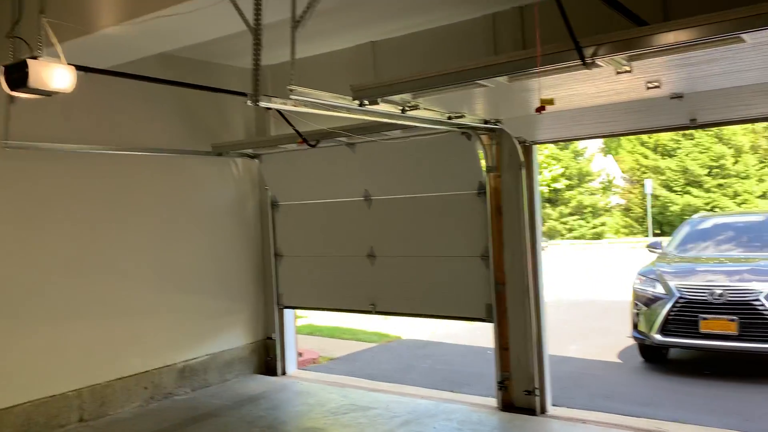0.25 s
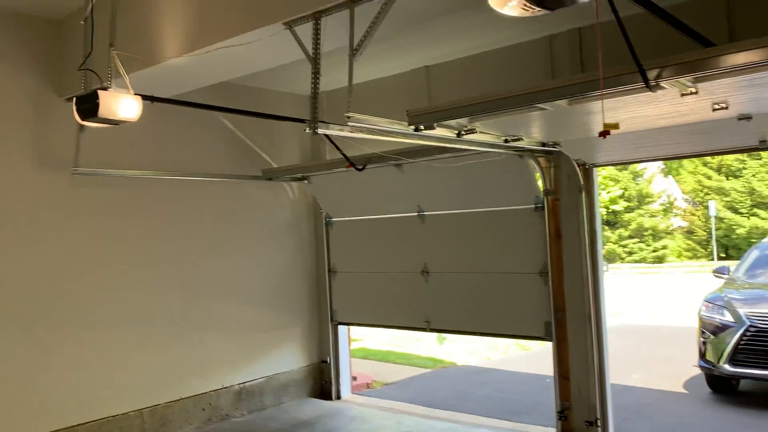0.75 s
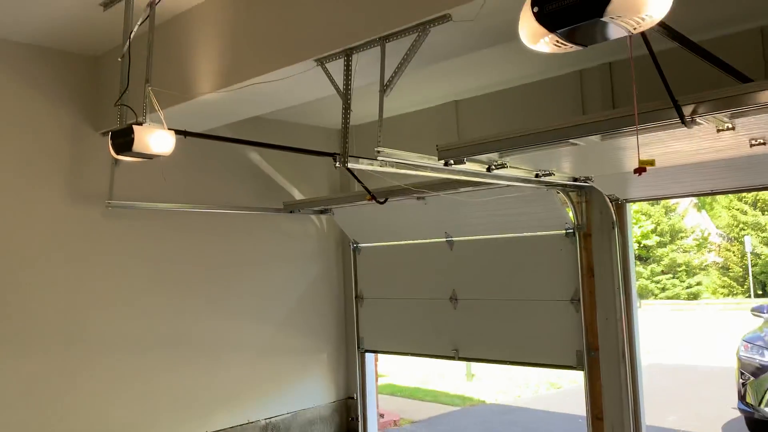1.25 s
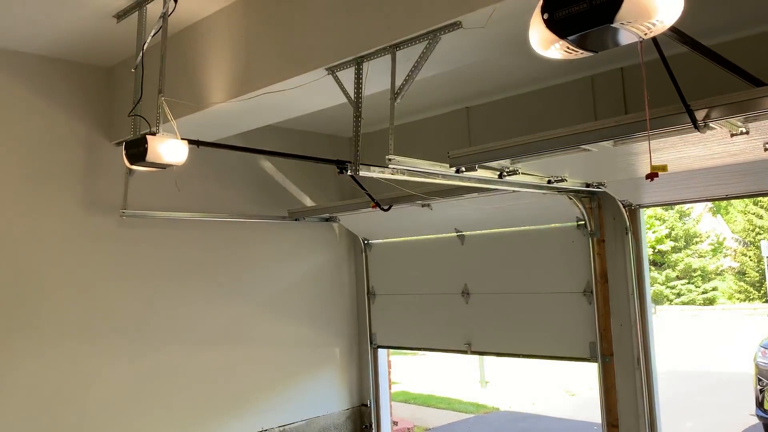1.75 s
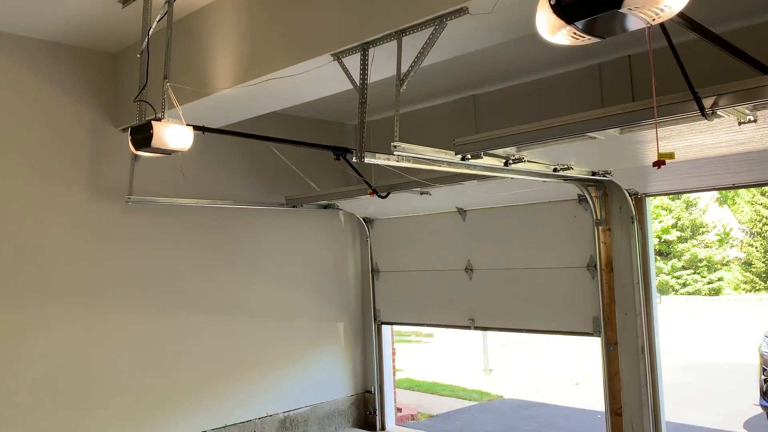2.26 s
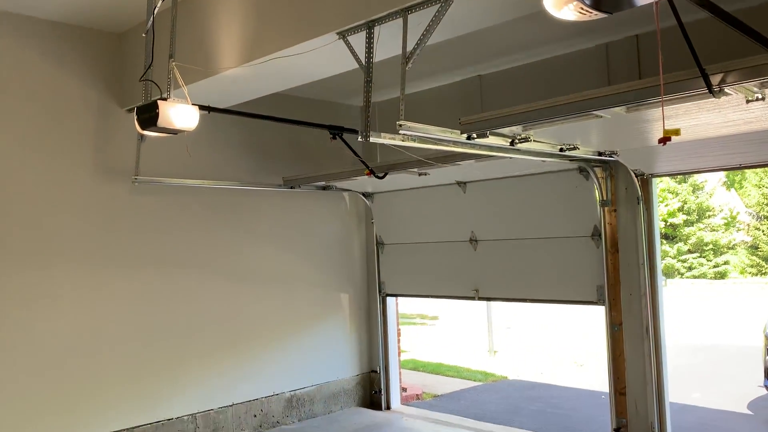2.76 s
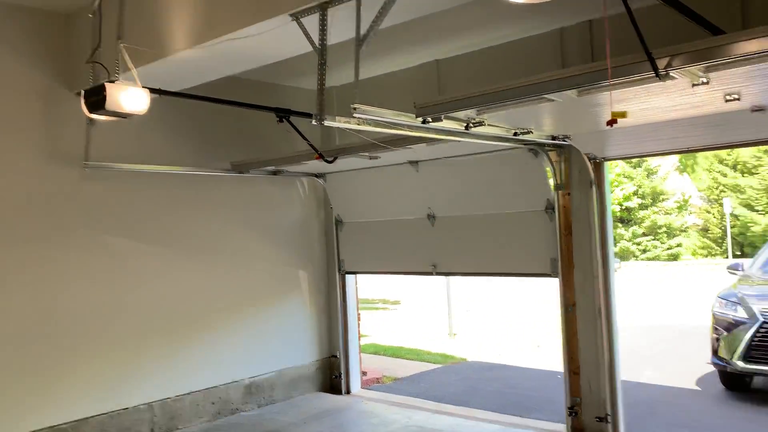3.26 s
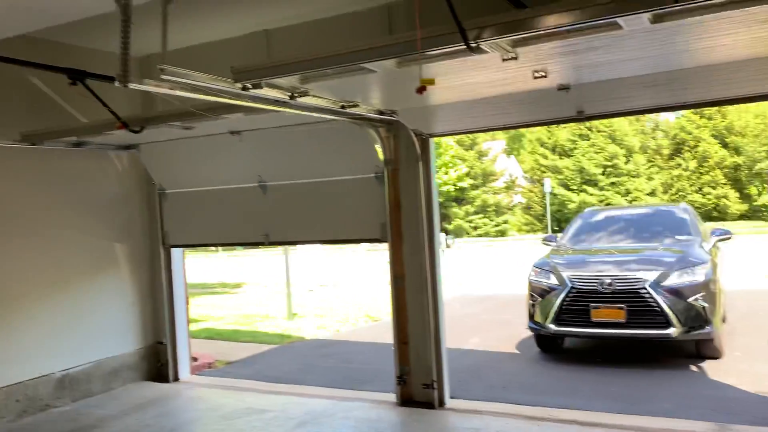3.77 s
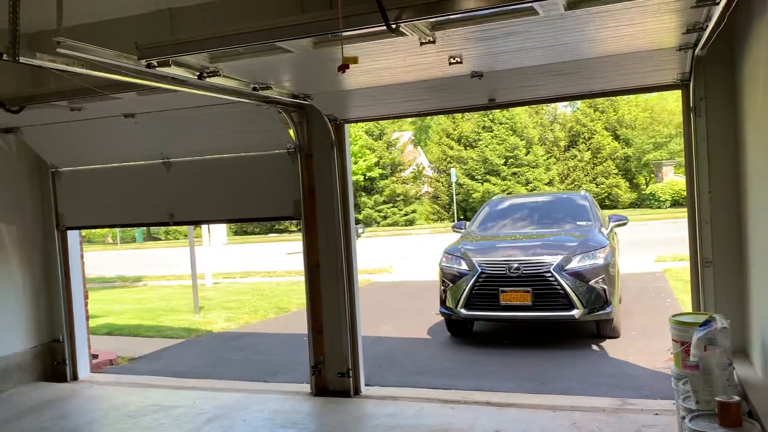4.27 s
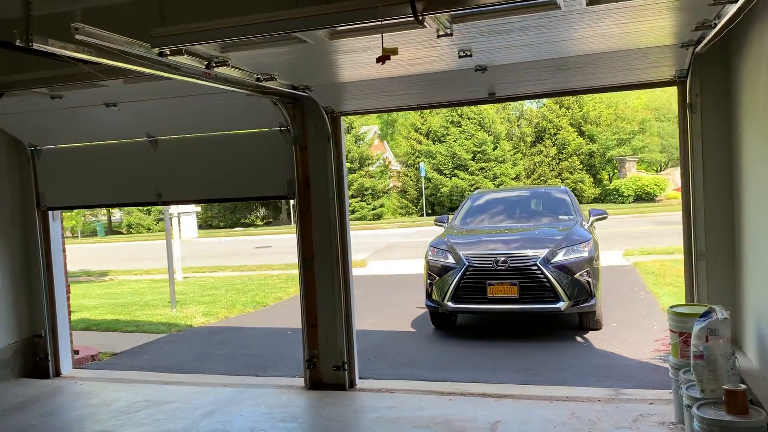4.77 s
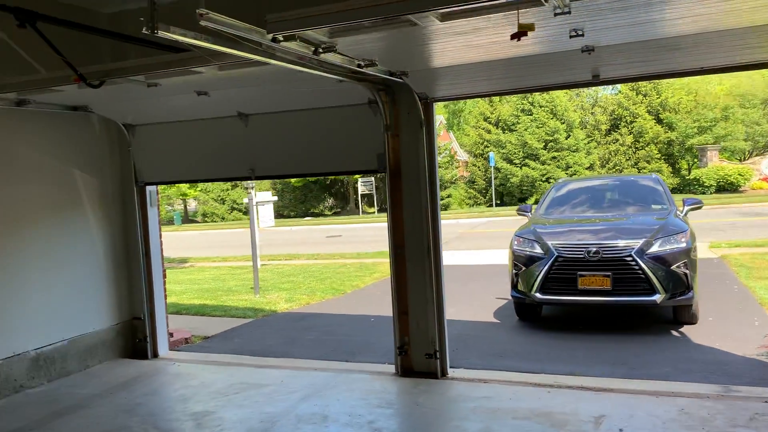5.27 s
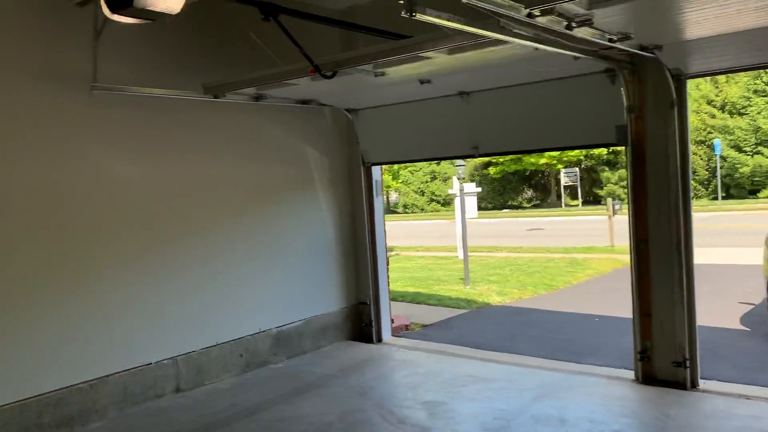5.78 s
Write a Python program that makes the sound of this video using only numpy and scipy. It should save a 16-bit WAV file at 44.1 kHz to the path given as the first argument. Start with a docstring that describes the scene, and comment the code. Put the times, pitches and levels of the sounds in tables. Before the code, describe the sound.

A garage door opener hums loudly overhead while a steel door rattles along its track, with clanks, thuds, and a short rising hinge squeal.

```python
"""An induction-motor opener under a garage ceiling hauls a sectional steel door along its tracks.
The motor's hum is a sum of sines at multiples of twice the mains frequency; joists, rollers, gears,
brackets and chain are coloured, flickering noise. Gliding sines squeal at a hinge and groan at a joint,
noise bursts ring the steel track, low sines thud in the panels; bare walls smear squeals and clanks.
Stereo comes from the two ports of a hand-held phone, turning about in the hum's standing waves."""
import sys
import numpy as np
from scipy import signal
from scipy.fft import rfft, irfft
from scipy.io import wavfile
from scipy.ndimage import uniform_filter1d

SR = 44100
rng = np.random.default_rng(int(sys.argv[2]) if len(sys.argv) > 2 else 0)


def transcribe(signal):
    """Save signal, clipped to [-1, 1], as a 16-bit WAV file at the path in sys.argv[1]."""
    frames = np.atleast_2d(signal).T
    limited = np.clip(frames, -1, 1)
    pcm = np.round(limited * 32767).astype(np.int16)
    wavfile.write(sys.argv[1], SR, pcm)


N = 266364
T = np.arange(N) / SR  # s
F = np.maximum(np.arange(N // 2 + 1) * SR / N, 1.)  # Hz
HUM_HZ = 119.9
SHAFT_HZ = 28.77  # mean rotor speed; the chain beats at half of it


def hum():
    """Magnetic pull on the stator at twice the mains frequency and its multiples."""
    # first order in the standing waves: start_s, level_db, left_minus_right_db
    first = [(0.0, -24, 0), (0.1, -21.5, -3.5), (0.3, -23, -2.5), (0.5, -29, -9), (0.68, -28.5, 5),
             (1.1, -24.5, 4.5), (1.5, -24.5, 5), (2.15, -22.5, 4), (2.64, -21, 3.5), (3.1, -22.5, 4.5),
             (3.6, -21, 4.5), (4.0, -22.5, 4.5), (4.4, -20.5, 3.5), (4.81, -15.5, 1.5), (5.5, -14, 1),
             (6.1, -13, 0.5)]
    # start_s, second_order_db, second_left_minus_right_db, third_order_db
    second_third = [(0.0, -41.5, 5, -46), (0.7, -47, 20, -57), (1.28, -37.5, 10, -63),
                    (1.72, -31.5, 2, -44), (2.3, -28, 2, -41.5), (2.79, -33, 7, -45), (3.2, -32, 2, -37),
                    (3.63, -36, 1, -38), (3.97, -33, 2, -37), (4.3, -41, 8, -41), (4.74, -41.5, 13, -55),
                    (5.0, -33, 6.5, -38), (5.26, -30, 3, -53.5), (5.58, -29.5, -1, -40.5),
                    (5.89, -39.5, 1, -47), (6.1, -34, 6, -33)]
    # start_s, fifth_order_db
    fifth = [(0, -58), (3.7, -61), (4.1, -49), (5.2, -45), (5.6, -60), (6.04, -56)]
    # steady upper orders: order, level_db
    upper = [(4, -55.5), (6, -49.5)]
    # start_s, right_port_lead_rad at first order, half_right_port_lead_rad at second order
    port_lead = [(0, .6, -1), (.75, .7, -.7), (1.4, .35, -.4), (3, .27, -.3), (4.2, .27, -.6),
                 (4.8, .27, .3), (5.3, .2, .25), (6.04, .1, 0)]
    # brief dips of the first order: centre_s, left_depth_db, right_depth_db
    dips = [(3.165, 4, 9), (3.45, 5, 11)]
    dip_half_s = 0.043
    waver_db, waver_per_s, throb_db = 1.6, 12, .6

    side = np.array([[.5], [-.5]])  # left, right
    level1_db, pan1_db = columns(first)
    level2_db, pan2_db, level3_db = columns(second_third)
    level5_db, = columns(fifth)
    lead_rad, half_lead2_rad = columns(port_lead)
    dip_db = bumps([(s, dip_half_s, *db) for s, *db in dips])
    orders = [(1, level1_db + side * pan1_db - dip_db), (2, level2_db + side * pan2_db),
              (3, level3_db), (5, level5_db)] + upper
    out = 0
    for k, db in orders:
        # higher orders break into more room modes: each port wavers alone
        waver = undb(waver_db * (k > 2) * np.array([walk(waver_per_s), walk(waver_per_s)]))
        throb = undb(throb_db * (k > 1) * np.sin(np.pi * SHAFT_HZ * T))  # with the chain
        lead = half_lead2_rad if k == 2 else lead_rad
        phase = k * (2 * np.pi * HUM_HZ * T - side * lead) + 2 * np.pi * rng.random()
        out = out + waver * throb * undb(db) * np.sin(phase)
    return np.sqrt(2) * out


def drive_train():
    """Joists shake, rollers rumble in panels, gears whirr, brackets rattle; chain hisses and sizzles."""
    # noise colours, one table a layer: freq_hz, density_db_per_hz
    shake_colour = [(18, -10), (25, -11), (35, -4), (55, 5), (70, 5), (90, -19)]
    rumble_colour = [(60, -10.5), (80, -8.5), (100, 2), (140, 3.5), (175, -8.5), (230, 1.5), (300, -6),
                     (370, 1), (440, -14), (540, -18.5), (900, -43.5)]
    whirr_colour = [(250, -17.5), (420, 0), (540, -3), (610, 1.5), (660, -0.5), (720, 0), (880, -6),
                    (1050, -2), (1150, -2.5), (1250, -4.5), (1400, -6), (1600, -9), (3000, -30)]
    rattle_colour = [(900, -39), (1500, 8), (2300, 6), (3300, 2.5), (4300, -2), (5300, -5.5), (6400, -12),
                     (7300, -13.5), (9000, -39)]
    hiss_colour = [(5000, -13), (6500, 6), (7400, 2), (8500, -5), (10100, 3), (10900, -2), (12400, -3),
                   (13500, -3.5), (15000, -15.5), (15900, 1)]
    sizzle_colour = [(7000, -25), (7600, -6), (8000, -4), (8350, 0), (8700, -2), (9200, -5), (9700, -25)]
    # door jolts on its track: centre_s, half_length_s, joists_swell_db, panels_swell_db, mids_swell_db
    jolts = [(.52, 0.097, 11, 3.5, 5), (1.63, 0.065, 1, 3.5, 3.5), (1.76, 0.055, 8, 4, 4),
             (2.2, 0.44, -1.5, 0.5, 3), (3.3, 0.17, 0, 1, 1.5), (3.85, 0.26, 3, 1.5, -1.5),
             (4.47, 0.16, 7, 2.5, 1.5), (5.8, 0.093, 1, -2, 1)]
    # treble about its mean: start_s, level_db
    treble_levels = [(0.0, 1), (0.68, 2), (0.9, -4.5), (1.25, -2.5), (1.52, 1.5), (1.76, 2), (1.95, -0.5),
                     (2.2, 3), (2.45, -2.5), (3.0, -2), (3.7, 1), (3.92, -4), (4.0, 4.5), (4.18, -2),
                     (4.4, 0.5), (4.62, -0.5), (4.78, -4), (5.1, -3.5), (5.68, 2), (6.1, 0.5)]
    # slow level of the sizzle: start_s, level_db
    sizzle_fade = [(0, 10), (1.8, 2), (2.6, -4.5), (5.1, -13), (5.8, 8.5)]
    # base levels, before swells and treble curve
    shake_db, rumble_db, whirr_db, rattle_db, hiss_db, sizzle_db = -47.5, -39, -40.5, -51, -60.5, -60
    whirr_jolt_share, rattle_treble_share = 0.82, 0.37
    chain_flicker_db, chain_flicker_per_s = 2.5, 9

    joists_db, panels_db, mids_db = bumps(jolts)
    treble_db, = columns(treble_levels)
    fade_db, = columns(sizzle_fade)
    turn_rad = 2 * np.pi * np.cumsum(SHAFT_HZ * (1 + 0.024 * walk(2.65))) / SR
    beat = np.sin(turn_rad / 2) + .5 * np.sin(turn_rad)
    pull = np.sin(2 * np.pi * HUM_HZ * T)
    grit = undb(1.6 * np.minimum(rng.exponential(size=N), 4))  # uneven from sample to sample
    links = grit * undb(1.2 * beat + 0.5 * walk(6.8))
    left = undb(np.array([[.8], [-.8]]))  # leans to the left

    shake = wash(shake_colour, 25, 71, 0.81, 10.0, 1, count=1)
    rumble = left * wash(rumble_colour, 138.6, 227.7, 1.43, 8.2, 1)
    whirr = left * wash(whirr_colour, 383, 924, 1.17, 8, undb(.5 * beat + 0.24 * pull), count=4)
    rattle = wash(rattle_colour, 2880, 4600, 1.6, 10, undb(1.0 * beat + 0.99 * walk(18)), count=4)
    hiss = wash(hiss_colour, 9600, 12500, chain_flicker_db, chain_flicker_per_s, links, count=4)
    sizzle = wash(sizzle_colour, 6500, 10000, chain_flicker_db, chain_flicker_per_s, links)
    return (undb(shake_db + joists_db) * shake
            + undb(rumble_db + panels_db) * rumble
            + undb(whirr_db + whirr_jolt_share * mids_db) * whirr
            + undb(rattle_db + mids_db + rattle_treble_share * treble_db) * rattle
            + undb(hiss_db + treble_db) * hiss
            + undb(sizzle_db + treble_db + fade_db) * sizzle)


def squeals():
    """Stick-slip at a dry hinge locks to one pitch after another, unevenly; a panel joint groans lower."""
    # hinge grips: start_s, length_s, slip_start_hz, slip_end_hz, first_order_db, second_order_db,
    # pitch_jitter_share
    grips = [(2.006, .022, 900, 915, -50, -36.5, .02), (2.04, .075, 1100, 1118, -41, -41.5, .014),
             (2.04, .09, 930, 950, -45, -52, .02), (2.085, .075, 1365, 1385, -56, -47, .012),
             (2.118, .085, 1118, 1130, -37, -35.5, .01), (2.205, .05, 1140, 1165, -38, -36, .02),
             (2.255, .085, 1170, 1205, -39, -36.5, .03), (2.255, .03, 1490, 1500, -43, -60, .01),
             (2.34, .06, 1230, 1305, -39.5, -44, .035), (2.4, .065, 1310, 1330, -38.5, -49, .035),
             (2.405, .025, 1450, 1460, -42, -60, .01), (2.468, .042, 1325, 1330, -38.5, -43, .024),
             (2.52, .055, 1340, 1350, -40, -47, .024), (2.58, .11, 1335, 1322, -47, -50, .014)]
    grip_edge_s, third_vs_second_db = 0.0072, -19
    grain_db, grains_per_s = 4, 80  # catch and let go within a grip
    groan_s, groan_length_s, groan_hz, groan_rise_hz_per_s, groan_db = 1.69, .21, 603, 70, -48

    wobble = walk(320)
    grain = undb(grain_db * np.minimum(walk(grains_per_s), 1))
    hinge = 0
    for s, length, from_hz, to_hz, db1, db2, jitter in grips:
        slip_hz = np.interp(T, [s, s + length], [from_hz, to_hz]) * (1 + jitter * wobble)
        phase = 2 * np.pi * np.cumsum(slip_hz) / SR
        orders_db = [db1, db2, db2 + third_vs_second_db]
        tone = sum(undb(db) * np.sin((k + 1) * phase) for k, db in enumerate(orders_db))
        hinge = hinge + hold(s, length, grip_edge_s) * tone
    low_hz = (groan_hz + groan_rise_hz_per_s * (T - groan_s)) * (1 + .03 * walk(60))
    joint = undb(groan_db) * hold(groan_s, groan_length_s, .05) * np.sin(2 * np.pi * np.cumsum(low_hz) / SR)
    return np.sqrt(2) * grain * (hinge + joint)


def clanks():
    """Rollers knock and scrape at track joints: rough contact rings the steel near the spot."""
    # start_s, rms_db, centre_hz, spread_octaves, contact_s, bright_snap_db
    contacts = [(.435, -38, 2800, 0.4, 0.043, -66), (0.521, -42, 2800, 0.43, 0.04, -73),
                (0.651, -46, 3500, .6, 0.082, -67), (1.5, -54, 5160, .1, 0.022, -62),
                (1.568, -30.5, 2700, 0.33, 0.017, -68), (1.569, -40.5, 4200, 0.12, 0.06, -70),
                (1.586, -37, 3300, .15, .02, -70), (1.588, -33, 2350, 0.35, 0.013, -70),
                (1.69, -42, 2400, .5, 0.035, -70), (1.735, -31.5, 2380, 0.33, 0.018, -55),
                (1.8, -42, 2680, 0.35, 0.022, -71), (1.84, -46, 2400, .3, .02, -70),
                (3.979, -43.5, 5000, 0.41, 0.028, -57), (4.331, -48.5, 4900, 0.35, 0.04, -62),
                (4.49, -36.5, 2580, 0.34, 0.027, -69), (4.64, -36, 2500, 0.1, 0.01, -74.5),
                (4.68, -43, 2150, .2, 0.026, -72), (4.76, -44, 2200, .35, 0.047, -72),
                (4.958, -38.5, 3450, 0.056, 0.017, -63), (4.968, -37, 2100, .06, 0.012, -69),
                (5.02, -50.5, 3500, .05, .04, -70), (5.732, -37.5, 1830, 0.13, 0.027, -60),
                (5.748, -40.5, 3400, 0.2, 0.03, -66), (5.81, -44, 3280, 0.18, 0.03, -70)]
    # steel resonances: freq_hz, width_hz, level_db
    track_modes = [(1055, 60, -2), (1450, 60, -8), (1850, 55, -2), (2100, 70, -1), (2320, 70, 0),
                   (2550, 70, 0.5), (2750, 70, -1), (3100, 60, -2), (3450, 60, 0), (3700, 60, -5),
                   (4220, 60, -3.5), (4500, 70, -9), (5200, 150, -3)]
    broad_db = -10  # unpitched response, against the modes
    spot_shift = .02  # random mode shift from spot to spot, share
    rise_s, grit_db, grit_per_s = 0.0028, 5, 207  # contact catches and slips
    snap_s = .014

    out, t = np.zeros(N + SR), np.arange(SR // 2) / SR
    f = np.maximum(np.arange(len(t) // 2 + 1) * SR / len(t), 1.)
    for s, db, near_hz, octaves, contact_s, snap_db in contacts + scrape():
        rough = rng.standard_normal((2, len(t) + 2))
        shift = 1 + spot_shift * rough[1, :len(track_modes)] * min(octaves / .4, 1)
        steel = undb(broad_db) + sum(undb(g) / (1 + 2j * (f - hz * m) / width)
                                     for m, (hz, width, g) in zip(shift, track_modes))
        push = rough[0, 2:] * np.exp(-t / contact_s) * np.minimum(t / rise_s, 1)
        push = push * undb(grit_db * walk(grit_per_s)[:len(t)])
        near = np.exp(-.5 * (np.log2(f / near_hz) / octaves) ** 2)
        ring = irfft(rfft(push) * steel * near, len(t))
        ring /= np.sqrt(np.sum(ring ** 2) / (SR * contact_s / 2))
        snap = np.diff(rough[1], 2) * t / snap_s * np.exp(1 - t / snap_s)
        out[int(s * SR):][:len(t)] += undb(db) * ring + undb(snap_db) * snap
    return out[:N]


def scrape():
    """One long scrape down the rail: a run of small contacts, falling in pitch, loudest past the middle."""
    start_s, length_s, from_hz, to_hz, top_db = 4.39, 0.2, 3840, 2150, -42.5
    swell_db, octaves, contact_s, snap_db = 3.5, 0.18, 0.03, -66
    u = np.linspace(0, 1, num=9)
    hz = from_hz * (to_hz / from_hz) ** u
    db = top_db - swell_db * ((u - .6) / 0.51) ** 2
    return [(s, d, h, octaves, contact_s, snap_db) for s, d, h in zip(start_s + length_s * u, db, hz)]


def panel_thuds():
    """Struck panels thud: low sines under short pulses, shaking unevenly."""
    # start_s, peak_db before the uneven shaking, pitch_hz
    thuds = [(.44, -29, 58), (.475, -23.5, 85), (.47, -34.5, 282.5), (.5, -34.5, 204), (.53, -33, 77.6),
             (0.55, -28, 134.4), (.56, -39, 200), (.63, -38, 270.5), (1.57, -27, 95.3), (1.621, -28, 217),
             (1.65, -35, 139), (6.005, -31, 70)]
    peak_s, loose_db = .03, 3
    out, t = np.zeros(N + SR), np.arange(SR // 2) / SR
    for s, db, low_hz in thuds:
        pulse = t / peak_s * np.exp(1 - t / peak_s)
        out[int(s * SR):][:len(t)] += undb(db) * np.sin(2 * np.pi * low_hz * t) * pulse
    return out[:N] * undb(loose_db * walk(60))


def room(dry, direct_db):
    """Bare walls: direct sound plus a dense tail for each port, in octave bands; treble dies first."""
    # freq_hz, t60_s
    room_t60 = [(200, 0.67), (1500, 0.92), (5000, 0.26), (12000, 0.1)]
    t = np.arange(SR) / SR
    f = np.maximum(np.arange(SR // 2 + 1), 1.)
    tail = 0
    for hz in 125 * 2. ** np.arange(8):
        mask = np.cos(np.pi / 2 * np.clip(np.log2(f / hz), -1, 1)) ** 2
        band = irfft(rfft(rng.standard_normal((2, SR))) * mask)
        tail = tail + band * 1000 ** (-t / over_hz(room_t60, hz))
    tail *= np.minimum(t / 0.0072, 1)
    tail /= np.sqrt(np.sum(tail ** 2, axis=1, keepdims=True))
    tail[:, 0] = undb(direct_db)  # direct against tail
    tail /= np.sqrt(1 + undb(2 * direct_db))
    return signal.fftconvolve(dry[None], tail, axes=1)[:, :N]


def wash(shape, lo_hz, hi_hz, flicker_db, rate, drive, count=2):
    """Coloured stereo noise, count flickering bands an octave; louder of mid, side has rms 1 in lo-hi."""
    # freq_hz, share_common_to_both_ports (0-1)
    likeness = [(20, 0.8), (130, 0.95), (290, 0.8), (640, 0.22), (1000, 0), (1800, 0.32), (3000, 0.02),
                (5800, 0.09), (6800, 0.2), (8400, 1), (9800, 1), (11000, 0.75), (16000, 1)]
    ripple_db = 1.9
    port_lag_s = .00031  # 900-5000 Hz reaches the left port this much later
    in_step_hz, turn_hz = 10850, 4850  # above 5 kHz: ports in step here, and again one turn higher
    like = np.clip(over_hz(likeness, F), 0, 1)
    turns = np.where(F > 5000, (F - in_step_hz) / turn_hz, F * port_lag_s * (F > 900))
    # many close resonances of panels and room ripple the spectrum
    ripple = np.interp(F, 25 * np.arange(900), rng.standard_normal(900)) * np.minimum(F / 600, 1)
    colour = undb(over_hz(shape, F) + ripple_db * ripple) * (F < shape[-1][0])
    one, other = rfft(drive * rng.standard_normal((2, N))) * colour
    pair = np.array([one, like * np.exp(2j * np.pi * turns) * one + np.sqrt(1 - like ** 2) * other])
    out, steps = np.zeros((2, N)), count * np.log2(F / shape[0][0])
    for k in range(int(count * np.log2(shape[-1][0] / shape[0][0])) + 2):
        overlap = np.maximum(1 - np.abs(steps - k), 0)
        out += irfft(pair * overlap, N) * undb(flicker_db * walk(rate))
    mid_side = rfft(np.array([out[0] + out[1], out[0] - out[1]]) / 2)[:, (F > lo_hz) & (F < hi_hz)]
    return out / np.sqrt(2 * np.sum(np.abs(mid_side) ** 2, axis=1).max()) * N


def undb(db):
    """Decibels to amplitude."""
    return 10 ** (np.asarray(db) / 20)


def columns(table):
    """Every column after the first as a curve over time."""
    s, *rest = np.transpose(table)
    return [np.interp(T, s, c) for c in rest]


def over_hz(table, hz):
    """A (Hz, value) table read on a log-frequency axis."""
    return np.interp(np.log(hz), np.log(np.array(table)[:, 0]), np.array(table)[:, 1])


def walk(rate):
    """Random levels held 1 / rate s and smoothed twice; spread near 1."""
    k = int(SR / rate)
    steps = np.repeat(rng.standard_normal(N // k + 1), k)
    return 1.44 * uniform_filter1d(uniform_filter1d(steps, k), k)[:N]


def bumps(table):
    """Bell curves in dB from rows (centre s, half length s, heights dB); one curve for each height."""
    return sum(np.array(db)[:, None] * np.exp(-((T - s) / half) ** 2) for s, half, *db in table)


def hold(start, length, edge):
    """Fade in, hold, fade out; 0-1."""
    return np.clip(np.minimum(T - start, start + length - T) / edge + .5, 0, 1)


def scene():
    """Hum and drive train, squeals and clanks in the room, thuds alike at both ports."""
    hinge = room(squeals(), direct_db=5.5)
    track = room(clanks(), direct_db=0)
    return hum() + drive_train() + hinge + track + panel_thuds()


def record(dry):
    """The phone cuts the top: steep elliptic low-pass."""
    return signal.sosfilt(signal.ellip(14, .3, 70, 15740, fs=SR, output="sos"), dry)


dry = scene()
out = record(dry)
transcribe(out)
```